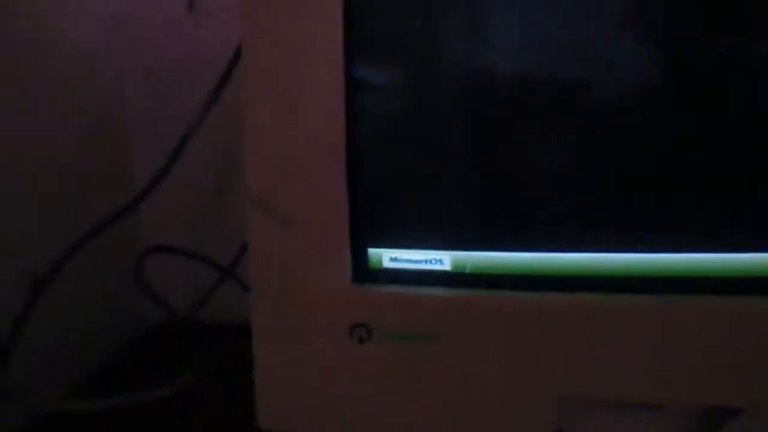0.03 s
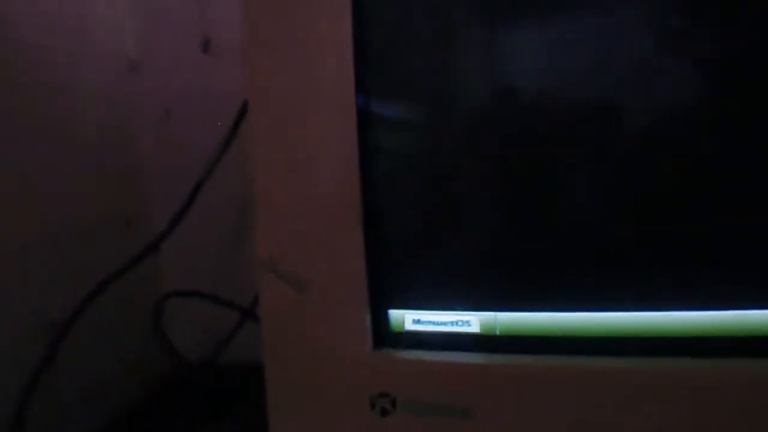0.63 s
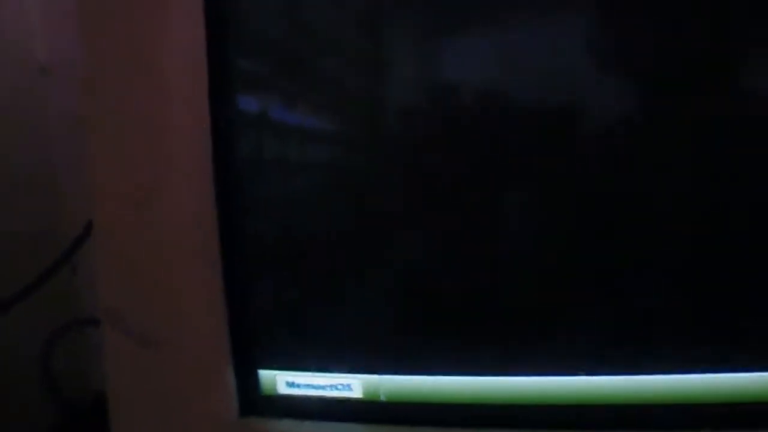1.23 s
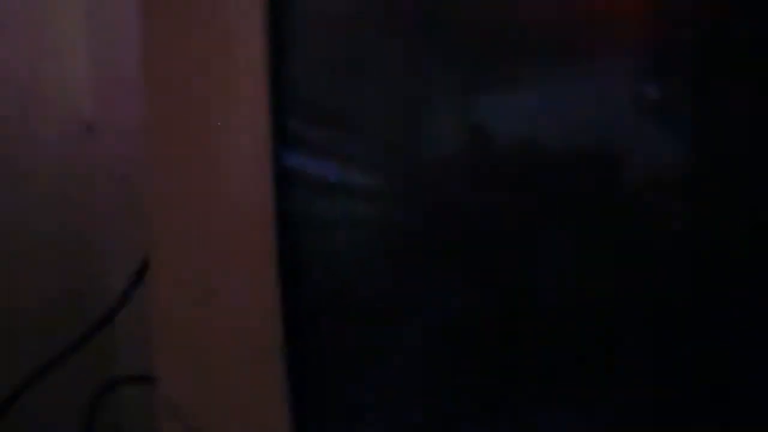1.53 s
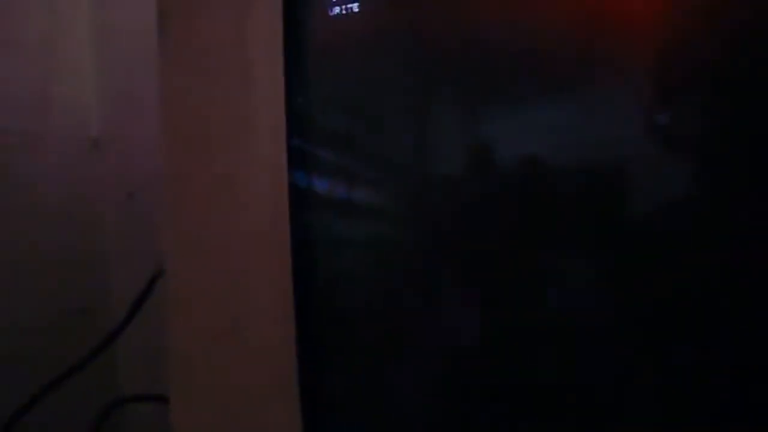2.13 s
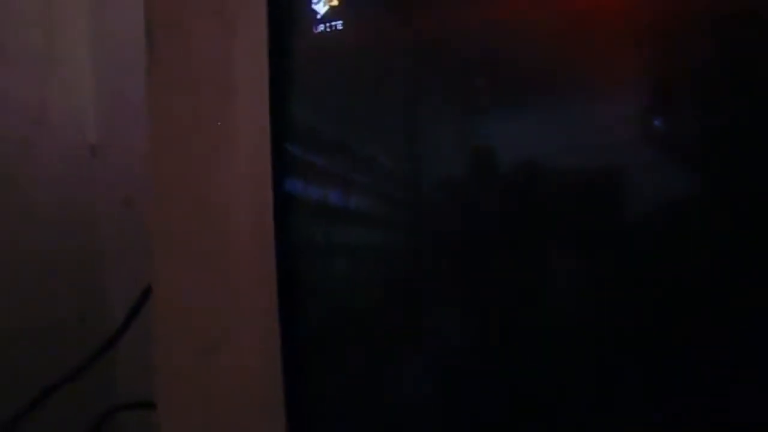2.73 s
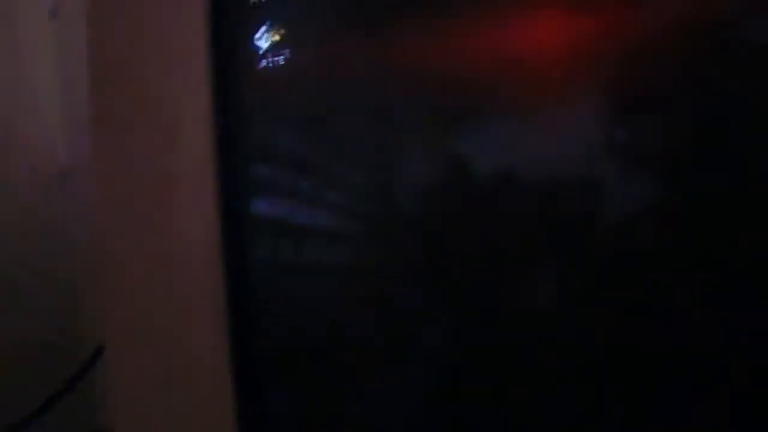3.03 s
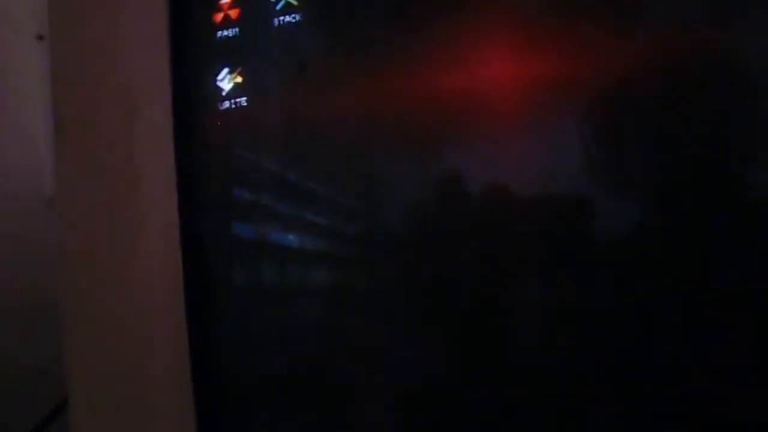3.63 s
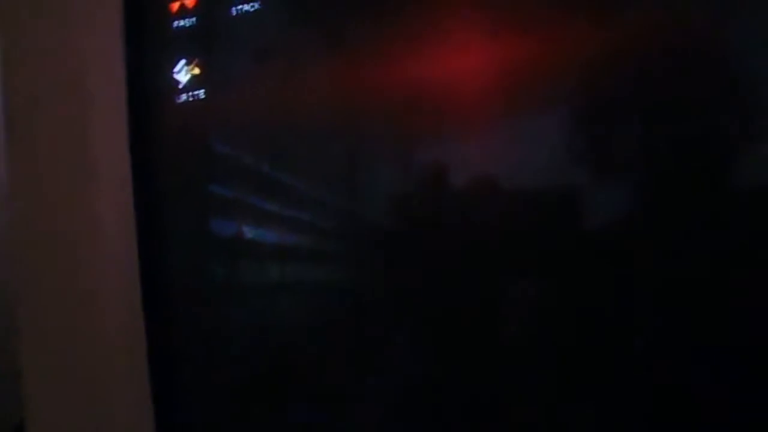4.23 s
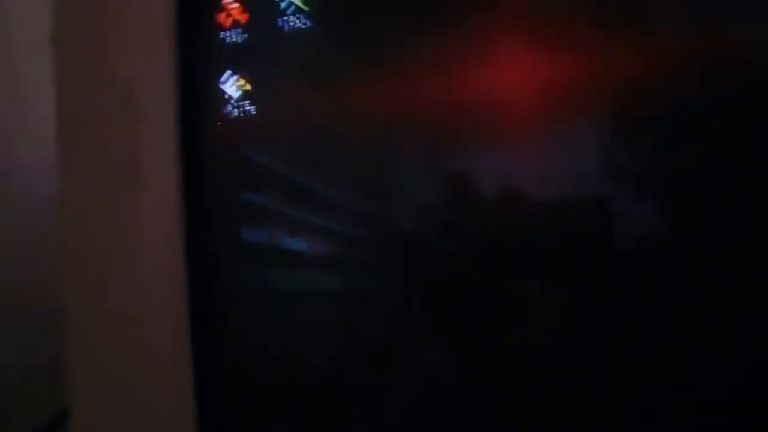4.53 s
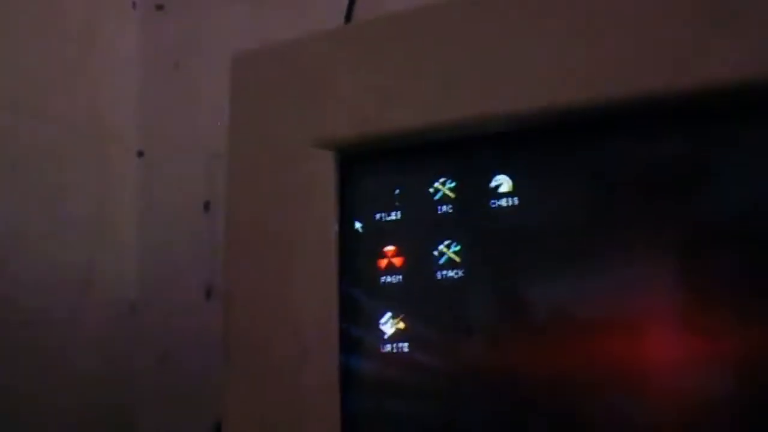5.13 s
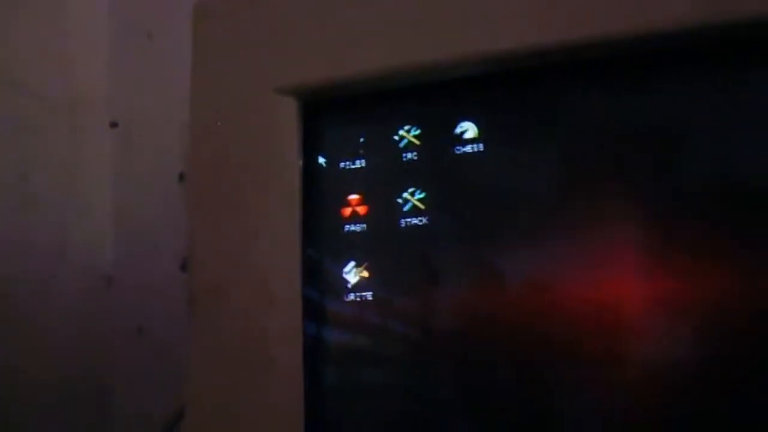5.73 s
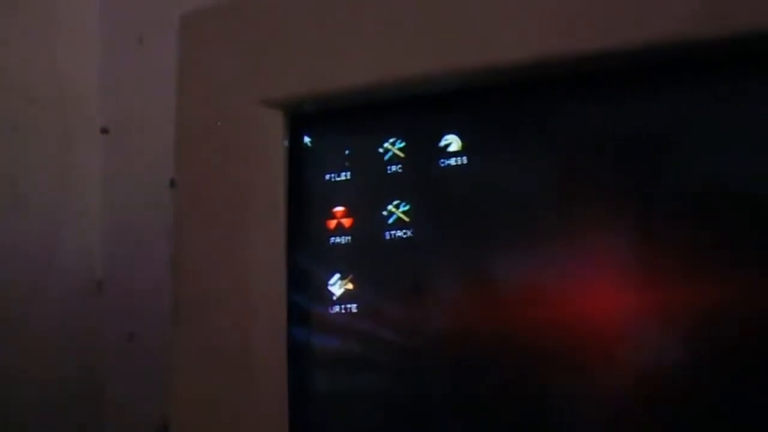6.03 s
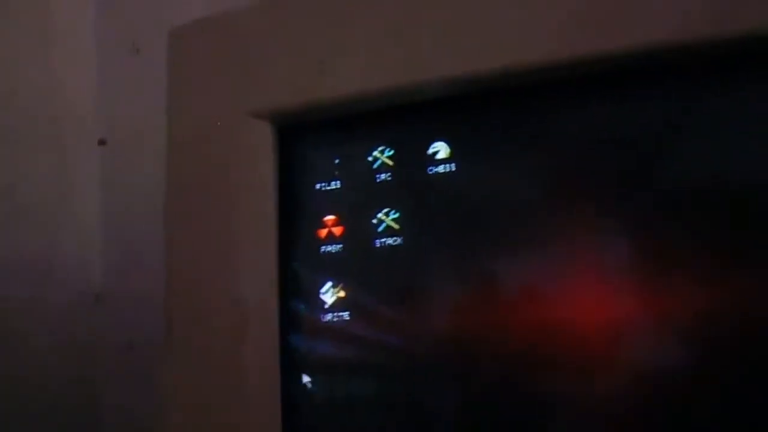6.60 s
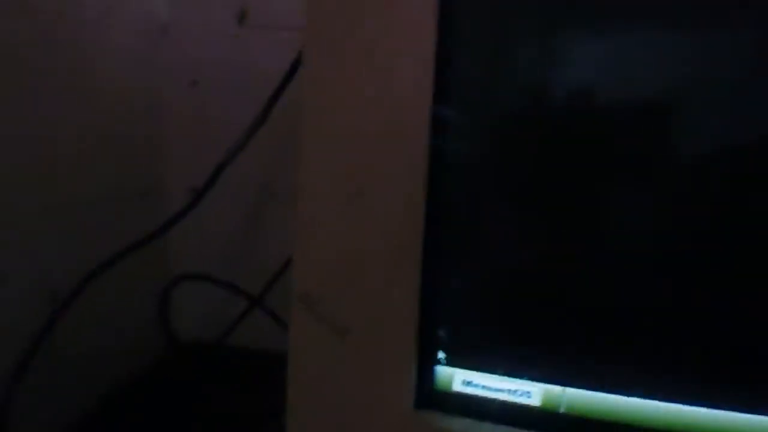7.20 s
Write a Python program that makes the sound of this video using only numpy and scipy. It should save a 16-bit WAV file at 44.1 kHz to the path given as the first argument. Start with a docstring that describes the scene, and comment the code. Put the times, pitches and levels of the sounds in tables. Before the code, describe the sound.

A computer mouse clacks irregularly on a desk, with a few sharp clicks and soft bumps, over an old computer's steady fan.

```python
"""A mouse clacks across a desk, its shell ringing as it lands on one edge and rocks onto the other.
Before it, three sharp plastic clicks snap close by; a hand bumps the desk, with a thud and a short ring,
and a few tiny dry ticks fall among the clacks. The room is small and hard-walled.
Underneath, an old desktop computer runs: its fan rushes and its disk whines faintly over the room's rumble.
Low drones, like engines outside, swell and sink through the walls."""
import sys
import numpy as np
from scipy import signal
from scipy.fft import rfft, irfft, next_fast_len
from scipy.io import wavfile
from scipy.ndimage import uniform_filter1d, map_coordinates

SR = 44100
rng = np.random.default_rng(int(sys.argv[2]) if len(sys.argv) > 2 else 0)


def store_wav(level_fs):
    """Save 16-bit WAV to argv[1]."""
    pcm = np.round(np.clip(np.atleast_2d(level_fs), -1, 1) * 32767)
    wavfile.write(sys.argv[1], SR, pcm.T.astype(np.int16))


N = 324576


def amp(db):
    """Decibels to gain."""
    return 10 ** (np.asarray(db) / 20)


def unit(x):
    """x at rms 1."""
    return x / np.sqrt(np.mean(x ** 2) + 1e-20)


def unit_hit(x):
    """x with its loudest 3 ms at rms 1."""
    return x / np.sqrt(uniform_filter1d(x ** 2, size=132).max() + 1e-20)


def curve(points, hz):
    """Read (frequency, value) breakpoints on a log frequency axis."""
    f, v = np.transpose(points)
    return np.interp(np.log(hz + 1), np.log(f + 1), v)


def bells(rows, hz):
    """Gain in dB of a few bell-shaped resonances."""
    return sum(db / (1 + ((hz - centre) / width) ** 2) for centre, width, db in rows)


def wobble(rate):
    """Smooth random modulation, rate knots a second."""
    return map_coordinates(rng.standard_normal(int(N * rate / SR) + 4), [np.arange(N) * rate / SR])


def eq(x, gain_db):
    """Minimum-phase EQ, so attacks stay sharp; gain_db is a function of frequency."""
    m = 2 * next_fast_len(len(x) // 2 + 2048)
    cepstrum = irfft(np.log(amp(gain_db(np.fft.rfftfreq(m, 1 / SR))) + 1e-6), m)
    cepstrum[1:m // 2] *= 2
    cepstrum[m // 2 + 1:] = 0
    return irfft(rfft(x, m) * np.exp(rfft(cepstrum)), m)[:len(x)]


def hit_time():
    """Half a second of time for one hit."""
    return np.arange(SR // 2) / SR


def decay(t60):
    """An envelope that falls 60 dB in t60 seconds."""
    return np.exp(-np.log(1000) * hit_time() / max(t60, 1e-3))


def attack(rise_s):
    """An envelope that opens fully in rise_s seconds."""
    return 1 - decay(rise_s)


def mode(hz, t60):
    """One struck resonance: a dying sine at random phase."""
    return decay(t60) * np.sin(2 * np.pi * (hz * hit_time() + rng.random()))


def burst(t60):
    """Dying noise: many close modes struck at once."""
    return rng.standard_normal(SR // 2) * decay(t60)


def add(track, s, x):
    """Mix x into the track at time s."""
    part = track[max(round(s * SR), 0):][:len(x)]
    part += x[:len(part)]


# reverb time of the room: f/Hz, t60/s
ROOM_DECAY = [(150, 0.31), (4000, 0.25), (8000, 0.13)]


def in_room(x, wet_db):
    """A hit and the walls' answer, which builds up over a few ms and dies sooner in the treble."""
    hz, t, noise = signal.stft(rng.standard_normal(SR // 2), SR, nperseg=256)
    damping = np.exp(-np.log(1000) * t / curve(ROOM_DECAY, hz)[:, None])
    build_up = 1 - np.exp(-t / 0.0053)
    tail = signal.istft(noise * damping * build_up, SR, nperseg=256)[1]
    return x + amp(wet_db) * signal.fftconvolve(x, tail / np.linalg.norm(tail))[:len(x)]


# EQ of the room tone: f/Hz, level/dB
RUMBLE_EQ = [(12, -5.5), (25, 9.5), (43, -7.5), (62, 6.5), (95, -5.5), (340, -13.5), (600, -54.5)]
# its fader ride: t/s, level/dB
RUMBLE_RIDE = [(0, -42.5), (3, -40.5), (4.7, -39.5), (5.7, -44), (7.36, -45)]


def room_rumble():
    """A bed of deep noise that slowly swells and falls back."""
    rumble = unit(eq(rng.standard_normal(N), lambda hz: curve(RUMBLE_EQ, hz)))
    ride_db = np.interp(np.arange(N) / SR, *np.transpose(RUMBLE_RIDE))
    return rumble * amp(ride_db + wobble(4.8))


def drone(path, trim_db, overtone_db, fade_db_per_s=22.5):
    """A drone heard through the walls, which pass its low tone and little of its overtones."""
    s, hz, db = np.transpose(path)
    t = np.arange(N) / SR
    phase = 2 * np.pi * np.cumsum(np.interp(t, s, hz)) / SR
    overtones = sum(amp(overtone_db + 3 * wobble(4)) * np.sin(k * phase) for k in (2, 3))
    outside_path_s = np.abs(t - np.clip(t, s[0], s[-1]))
    level_db = np.interp(t, s, db) - fade_db_per_s * outside_path_s
    return np.sqrt(2) * amp(level_db + trim_db + wobble(4.6)) * (np.sin(phase) + overtones)


# drone paths (held pitch, dive, slow sag, brief higher hum): t/s, f/Hz, level/dB before trim
HELD_PATH = [(0.5, 74.8, -46), (1.41, 74.4, -38.5), (1.84, 74.7, -30.5), (2.55, 75.1, -35.5),
             (3.02, 74.6, -49.5)]
DIVING_PATH = [(4.1, 71, -49), (4.6, 70, -35), (4.8, 61.2, -30.5), (4.95, 54.6, -33), (5.2, 49.3, -89)]
SAGGING_PATH = [(5.1, 78.7, -41.5), (6.31, 77.4, -38), (6.49, 77.2, -51.5), (6.7, 74.74, -38),
                (7.2, 75.8, -53)]
HUM_PATH = [(.15, 196, -67.5), (.5, 201.6, -51.5), (.75, 201.4, -70)]


def far_drones():
    """A brief hum, then three low drones in turn, like engines outside."""
    return (drone(HELD_PATH, trim_db=0.9, overtone_db=-45.0)
            + drone(DIVING_PATH, trim_db=-4.0, overtone_db=-30.5)
            + drone(SAGGING_PATH, trim_db=-2.3, overtone_db=-19.0)
            + drone(HUM_PATH, trim_db=4.5, overtone_db=-29))


# EQ of the fan's rush: f/Hz, level/dB
AIR_EQ = [(240, -27.5), (400, -5.5), (544, -9.5), (642, -4), (799, -13), (1600, -14.5), (3000, -22),
          (3850, -22.5), (4700, -28), (8110, -33), (8540, -71.5)]
# narrow bands in the rush: f/Hz, half width/Hz, boost/dB
AIR_BELLS = [(656, 25, 4), (5530, 170, 8.5)]
# tones of fan and disk: f/Hz, rms level/dB
WHINE_TONES = [(238, -64), (347, -63.5), (641, -67), (680, -68), (1491, -71), (7853, -87), (7881, -87),
               (8118, -89), (8149, -90)]


def computer():
    """Air rushes through the case; fan and disk tones waver slightly."""
    t = np.arange(N) / SR
    air = unit(eq(rng.standard_normal(N), lambda hz: curve(AIR_EQ, hz) + bells(AIR_BELLS, hz)))
    air *= amp(-54.5 + 0.72 * wobble(1.7))
    whine = sum(amp(db + 2 * wobble(7)) * np.sin(2 * np.pi * hz * t + 0.7 * wobble(7))
                for hz, db in WHINE_TONES)
    return air + np.sqrt(2) * whine


# tick cues: t/s, level/dB before trim, strongest f/Hz
TICK_CUES = [(3.158, -39.5, 4500), (4.812, -38, 3160), (5.121, -37.5, 5800)]


def ticks(trim_db=-10.5):
    """Tiny bright ticks, too close to stir the room."""
    track = np.zeros(N)
    for s, db, centre_hz in TICK_CUES:
        tick_eq = [(centre_hz / 3, -28), (centre_hz, 5), (8500, -15)]
        tick = eq(burst(0.015), lambda hz: curve(tick_eq, hz))
        add(track, s, amp(db + trim_db) * unit_hit(tick))
    return track


# modes of the desk top: f/Hz, level/dB
DESK_MODES = [(178, -0.5), (272, -0.5), (308, -2), (338, -4.5), (462, 0), (535, -3), (705, 0), (987, -4),
              (1110, -15), (1440, -8.5), (2340, -5)]
# EQ of the knock: f/Hz, level/dB
KNOCK_EQ = [(130, -16), (320, -6.5), (950, -1), (2200, -13), (5000, -52)]
# bump cues: t/s, level/dB before trim, thud f/Hz, knock level/dB, ring t60/s at the thud's pitch
BUMP_CUES = [(1.1225, -24, 305, -5, .075), (2.746, -36.5, 330, -17, 0.08), (2.755, -31, 340, -12, 0.11),
             (2.769, -34, 240, -12, .11), (3.2, -31, 200, -29, 0.19), (3.286, -35, 330, -20, 0.12),
             (3.297, -35, 190, -24, 0.18), (3.375, -37, 186, -22, 0.2), (3.528, -36.5, 363, -18, .1),
             (3.538, -31, 186, -13, .1), (3.554, -32.5, 308, -12, .1), (4.121, -40, 331, -26, 0.28),
             (4.566, -38, 213, -30, 0.18), (5.015, -39.5, 210, -23, .17), (5.254, -24.5, 380, -5.5, 0.1),
             (5.268, -24, 180, -15, 0.18)]


def desk_bumps(trim_db=2.0, thud_db=0.5, falloff_db_per_octave=13):
    """A hand's thud stirs the desk modes near its pitch; a hard knock reaches the high modes too."""
    track = np.zeros(N)
    for s, db, thud_hz, knock_db, t60 in BUMP_CUES:
        thud = np.sin(2 * np.pi * thud_hz * hit_time()) * decay(0.025) * attack(0.025) ** 2
        ring = 0
        for hz, mode_db in DESK_MODES:
            drive = amp(-falloff_db_per_octave * abs(np.log2(hz / thud_hz)))
            drive += amp(knock_db) * (hz > 2 * thud_hz)
            mode_t60 = t60 * np.sqrt(thud_hz / hz)  # higher modes die sooner
            ring += amp(mode_db + rng.normal(0, 1)) * drive * mode(hz, mode_t60)
        knock = unit_hit(eq(burst(0.15), lambda hz: curve(KNOCK_EQ, hz)))
        body = (unit_hit(ring * attack(0.021)) + amp(knock_db) * knock) * attack(0.0085)
        bump = unit_hit(amp(thud_db) * unit_hit(thud) + body)
        add(track, s, amp(db + trim_db) * in_room(bump, wet_db=-9.5))
    return track


# modes of the plastic part: f/Hz, level/dB, t60/s
PLASTIC_MODES = [(1185, -2.5, 0.035), (1650, 2.5, 0.022), (1800, 4, 0.025), (2030, -4, 0.025),
                 (2960, -2.5, 0.018), (3480, -0.5, 0.022)]
# EQ of its crack, before the treble shelf: f/Hz, level/dB
CRACK_EQ = [(350, -35), (600, -4), (701, -16), (1780, 4), (2740, -10), (3500, -20.5), (8500, -49.5)]
# click cues: t/s, level/dB before trim
CLICK_CUES = [(0.0457, -36.5), (0.1526, -16.5), (0.2575, -41), (0.266, -36.5), (0.307, -20), (0.407, -39),
              (0.415, -29), (0.4225, -30.5)]


def plastic_clicks(trim_db=-7.0, full_force_db=-16.5):
    """A small plastic part snaps close by: a crack and short modes; light touches are dull, ring less."""
    track = np.zeros(N)
    for s, db in CLICK_CUES:
        force_db = db - full_force_db
        treble_db = 19.5 + 0.39 * force_db
        crack_shelf = [(2200, 1), (3200, -3.5 + treble_db / 2), (5000, treble_db)]
        ring_shelf = [(2800, 0), (3500, min(force_db, 0))]
        ring = sum(amp(mode_db + rng.normal(0, 0.55) + curve(ring_shelf, hz)) * mode(hz, t60)
                   for hz, mode_db, t60 in PLASTIC_MODES)
        ring = amp(0.47 * force_db) * unit_hit(ring * attack(0.0049))
        crack = eq(burst(0.047), lambda hz: curve(CRACK_EQ, hz) + curve(crack_shelf, hz))
        snap = amp(db + trim_db) * unit_hit(ring + amp(-6.5) * unit_hit(crack))
        add(track, s, in_room(snap, wet_db=-17.5))
        add(track, s + 0.014, amp(-14) * snap)  # slap off the wall behind the desk
    return track


# EQ of the mouse's clatter: f/Hz, level/dB
CLATTER_EQ = [(260, -38), (450, -10), (675, 0.5), (1040, -4.5), (2040, -8), (3180, -12.5), (3870, -9),
              (4600, -15.5), (7550, -21.5), (8500, -40.5)]
# modes of its shell: f/Hz, level/dB, t60/s
MOUSE_MODES = [(1803, -3, 0.027), (2085, 5, 0.03), (2344, 5.5, 0.029), (2797, -1, 0.04),
               (3730, -9.5, 0.065), (5770, -7, 0.11)]


def mouse_hit(db, ring_hz, treble_db, trim_db=-6.0):
    """The mouse's shell is struck, chatters and rings; from across the desk the walls add their answer."""
    def blow_db(hz):
        """The struck spot's resonance stands out; small, high parts give little body."""
        low_shelf = curve([(ring_hz / 3, -4.5), (ring_hz, 0)], hz)
        high_shelf = curve([(3600, 0.0074), (5500, treble_db)], hz)
        return low_shelf + bells([(ring_hz, 170, 6)], hz) + high_shelf

    flutter_db = 2 * unit(uniform_filter1d(rng.standard_normal(SR // 2), size=90))
    chatter = burst(0.11) * amp(flutter_db)
    contact = (chatter + burst(0.016)) * attack(0.0061)
    clatter = unit_hit(eq(contact, lambda hz: curve(CLATTER_EQ, hz) + blow_db(hz)))
    struck_mode = (ring_hz, -1, 0.045)
    ring = 0
    for hz, mode_db, t60 in [struck_mode, *MOUSE_MODES]:
        # the grip shifts each mode's level and pitch a little on every hit
        grip_db, grip_detune = rng.normal(0, 2.5), rng.normal(1, 0.018)
        ring += amp(mode_db + blow_db(hz) + grip_db) * mode(hz * grip_detune, t60)
    hit = unit_hit(clatter + amp(-1.5) * unit_hit(ring * attack(0.002)))
    return amp(db + trim_db) * in_room(hit, wet_db=-7.0)


# landing cues: t/s, level/dB before trim, ring f/Hz, treble shelf/dB, delay of the second edge/s
CLACK_CUES = [(2.331, -37, 1790, -6, 0.004), (2.873, -44.5, 3705, -5, 0.0087),
              (3.376, -37, 1610, -7.5, 0.019), (3.740, -37.5, 1700, 0, 0.019),
              (3.7574, -39.5, 3490, -4, 0.005), (3.859, -33, 2300, -4, 0.0051),
              (3.968, -36.5, 1770, -2, 0.014), (4.049, -33, 1860, 1, 0.007), (4.184, -37, 1610, -2, .017),
              (4.274, -27.5, 2770, 0.5, 0.0075), (4.5145, -30, 2830, 0, 0.006),
              (4.7494, -27.5, 2380, -0.5, 0.0072), (4.9639, -29.5, 2750, 0, 0.0083),
              (5.2545, -28, 2266, -3, 0.012), (5.359, -36, 2310, -5, 0.017),
              (5.4398, -29.5, 2930, -2, .006), (5.990, -36, 3070, -2.5, 0.007),
              (6.163, -39, 3570, -5, 0.0063), (6.2079, -29, 2990, 0.5, 0.013),
              (6.421, -40.5, 2720, -1.5, 0.023), (6.662, -32.5, 2805, -6.5, 0.0095),
              (6.936, -31.5, 2724, -4.5, 0.006), (7.17, -33, 2730, -7.5, 0.004),
              (7.194, -43, 3746, 0, 0.0075)]
# light taps in between: t/s, level/dB before trim, ring f/Hz
TAP_CUES = [(1.1147, -39, 2100), (2.2438, -43.5, 2160), (3.232, -39, 2120), (3.653, -41.5, 3520),
            (3.808, -46.5, 2150), (4.018, -37.5, 1900), (4.24, -42, 1520), (4.478, -40, 1480),
            (4.705, -42.5, 1670), (4.925, -44, 1500), (5.229, -41.5, 2430), (5.507, -40.5, 2250),
            (5.9172, -43, 2710), (5.941, -41, 3020), (6.371, -42.5, 3130), (6.483, -41.5, 2720),
            (7.267, -44, 3590)]


def mouse_clacks(ordinary_db=-34, push_from_s=4.2, push_to_s=5.1):
    """The mouse lands on one edge and rocks onto the other, higher and brighter; taps do not rock."""
    track = np.zeros(N)
    for s, db, ring_hz, treble_db, rock_s in CLACK_CUES:
        rock_db = ordinary_db - 5.5 + 0.58 * (db - ordinary_db)  # harder landings rock harder
        add(track, s, mouse_hit(db, ring_hz, treble_db))
        add(track, s + rock_s, mouse_hit(rock_db, 1.3 * ring_hz, treble_db + 4))
        if push_from_s < s < push_to_s:  # pushed along, it drags: a soft scuff leads the landing
            add(track, s - 0.01, mouse_hit(db - 10, ring_hz, treble_db))
    for s, db, ring_hz in TAP_CUES:
        add(track, s, mouse_hit(db, ring_hz, treble_db=-4))
    return track


def scene():
    """The mono mix, as heard in front of the monitor."""
    bed = room_rumble() + far_drones() + computer()
    return (bed + ticks() + desk_bumps() + plastic_clicks() + mouse_clacks())[None]


def record(dry):
    """A steep high cut on the whole mix."""
    cutoff_hz = 8550
    m = next_fast_len(N + SR // 2)
    hz = np.fft.rfftfreq(m, 1 / SR)
    return irfft(rfft(dry, m) / np.sqrt(1 + (hz / cutoff_hz) ** 140), m)[:, :N]


dry = scene()
out = record(dry)
store_wav(out)
```